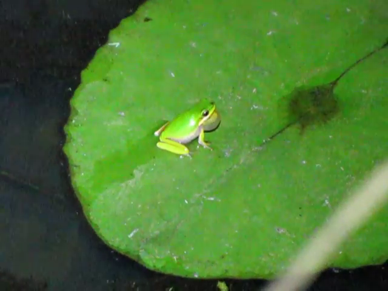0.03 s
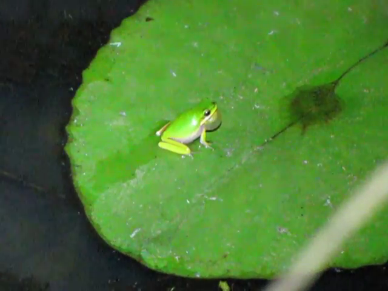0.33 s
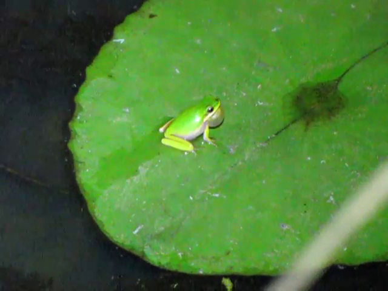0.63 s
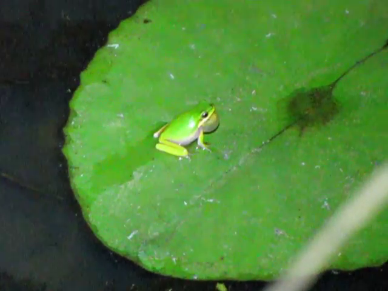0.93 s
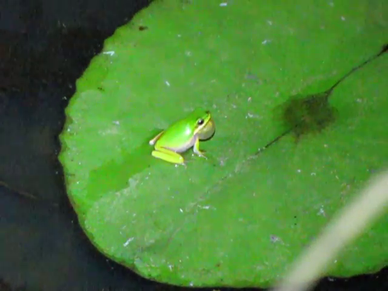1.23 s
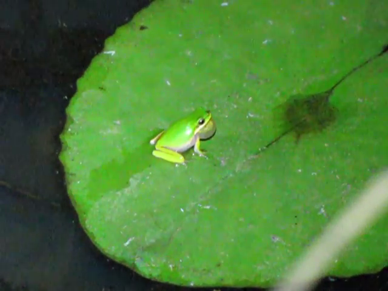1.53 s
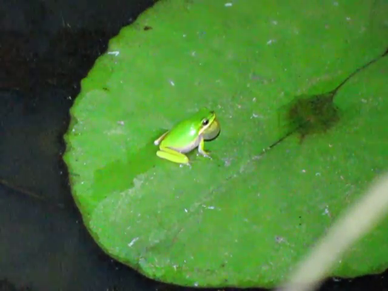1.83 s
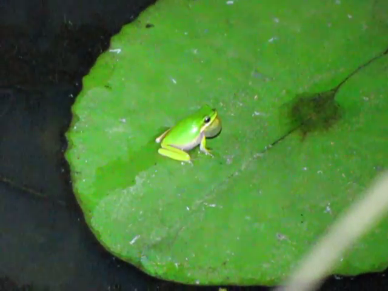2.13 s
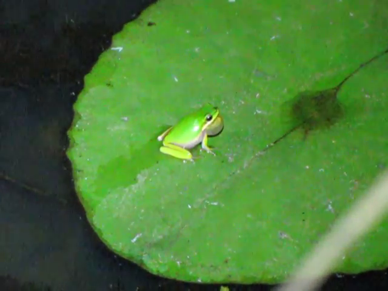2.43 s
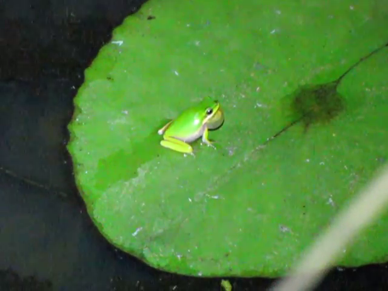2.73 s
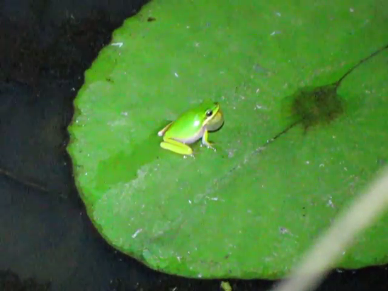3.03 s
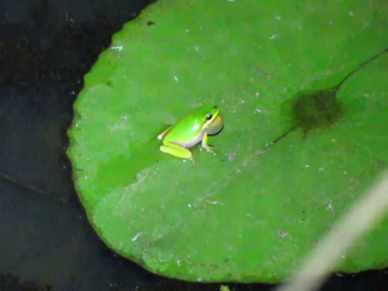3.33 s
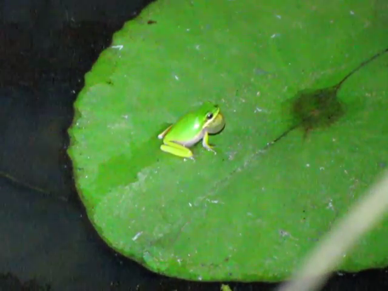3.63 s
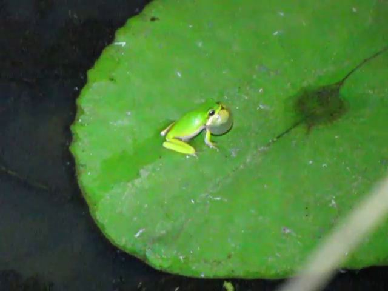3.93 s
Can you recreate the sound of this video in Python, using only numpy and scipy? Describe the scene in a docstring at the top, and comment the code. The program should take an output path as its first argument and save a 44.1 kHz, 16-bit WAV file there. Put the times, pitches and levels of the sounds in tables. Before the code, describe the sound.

Tree frogs call close to the microphone with high, rising creaks and sharp clicks. Behind them a night pond carries a continuous frog chorus, lower trills, a slowing run of rattling quacks and a faint insect buzz.

```python
"""Tree frogs creak and click close by at a night pond. Each call is a train of ringing pulses near
4.5 kHz: long trains rise as creaks, short ones snap as clicks. Behind them sit a chorus of the same
kind, lower trills and a slowing run of rattling quacks, all scattered by water and plants.
A thin insect buzz, a wash of far callers and night rumble, and a faint hum fill the background."""
import sys
import numpy as np
from scipy import signal
from scipy.io import wavfile
from scipy.ndimage import uniform_filter1d

SR = 44100
rng = np.random.default_rng(int(sys.argv[2]) if len(sys.argv) > 2 else 0)


def to_wav(s):
    """Save 16-bit WAV."""
    ch = np.atleast_2d(s).T  # columns
    pcm = np.round(np.clip(ch, -1, 1) * 32767)  # PCM
    wavfile.write(sys.argv[1], SR, pcm.astype(np.int16))


N = 176400
TIME = np.arange(N) / SR

# Near frog voices, by name: left over right/dB, left phase lead/rad, after-pulse gain, brightness/dB
FROG_VOICES = {"a": (-3, -1.57, .5, 0), "b": (-1, 4, 0.64, 5.5), "c": (-1.4, 1.91, 0.34, -0.23),
               "d": (2, 0.9, 0.22, 7), "e": (-6, -3, 1.1, 0.5), "f": (4, 0.94, 0.17, 0)}
# Their calls: frog, first pulse t/s, last pulse t/s, pulse count, first and last gap over middle gap,
# start f/Hz, end f/Hz, relative level/dB at start, middle and end
FROG_CALLS = [ ("d", .0111, .0234, 2, 1, 1, 4700, 4630, -9, -10, -11),
              ("a", .1577, .1733, 3, .97, 1.03, 4560, 4330, -6, -9, -11.5),
              ("d", .3083, .3322, 4, 1, 1.08, 4540, 4450, -7.5, -9, -15),
              ("b", .3386, .5309, 16, .97, 1.12, 4450, 4650, -17, -15, -13.5),
              ("b", .7721, .7939, 4, .97, .96, 4620, 4500, -11, -6, -12.5),
              ("a", 1.0289, 1.1401, 11, .87, 1.15, 4170, 4650, -9, -7, -11.5),
              ("b", 1.2715, 1.3559, 8, 1.02, 2, 4280, 4580, -23, -10.5, -9.5),
              ("c", 1.466, 1.553, 8, 1, 1, 3400, 3650, -22, -20, -24),
              ("a", 1.4927, 1.5084, 3, 1, 1, 4600, 4340, -6, -10, -14),
              ("f", 1.818, 1.926, 10, 1, 1, 4150, 4400, -20, -19, -21),
              ("c", 2.1775, 2.201, 3, .94, 1.06, 4350, 4300, -16, -13, -14),
              ("b", 2.17, 2.209, 5, 1, 1, 3400, 3550, -22, -16, -20),
              ("c", 2.292, 2.428, 11, 1, 1, 3700, 3820, -23, -21, -16),
              ("c", 2.441, 2.839, 33, 1.12, 1.085, 3900, 4560, -14, -7.5, -6),
              ("e", 2.9645, 3.203, 18, 1, 1.06, 4380, 4520, -17, -14, -11),
              ("c", 3.3375, 3.3566, 3, 1.04, .96, 4370, 4400, -4, -4, -7),
              ("e", 3.5118, 3.5329, 3, .88, 1.12, 4350, 4410, -12, -9, -8),
              ("f", 3.6845, 3.8015, 12, 1.04, .96, 4200, 4550, -18.5, -15, -14),
              ("f", 3.8115, 3.9508, 15, 1.01, .99, 4550, 5080, -14, -13, -12),
              ("d", 3.961, 3.9805, 3, 1.07, .93, 4950, 4890, -6.5, -7, -8.5),
              ("f", 3.9977, 4.007, 2, 1, 1, 4350, 4350, -7, -8, -9)]
# Fader ride of the chorus: t/s, relative level/dB
CHORUS_RIDE = [(0, 4), (.22, -3), (.6, 1), (.85, -2), (1, 1), (1.25, -1), (1.65, -3), (1.98, -1.5),
               (2.15, 1.5), (2.6, 3.5), (2.9, -1), (3.4, -1.5), (3.75, 4.5), (4, 4)]
# Lower trills: start t/s, length/s, pulse rate/Hz, f/Hz, relative level/dB, low resonance against main/dB
TRILL_CALLS = [(-.03, .27, 68, 2580, -26, -4), (.2, .21, 55, 2620, -30, -14), (.53, .24, 72, 2600, -25, -4),
               (.82, .18, 70, 2550, -32, -5), (1.36, .22, 60, 2600, -31, -12),
               (1.54, .23, 80, 2620, -26, -5), (1.95, .3, 66, 2500, -34, -6),
               (2.3, .25, 62, 2850, -27, -16), (2.38, .24, 70, 2560, -27, -4),
               (2.62, .2, 62, 2580, -31, -8), (2.82, .27, 60, 2610, -27, -16),
               (3.43, .29, 72, 2600, -25, -5), (3.72, .33, 70, 2550, -31, -4)]
# Fader ride of the quacks: t/s, relative level/dB
QUACK_RIDE = [(.7, -13), (1.05, -7.5), (1.7, -4.5), (2.2, -0.5), (2.6, 2), (2.9, -1), (3.2, 1), (3.6, -1),
              (3.9, -2)]
# Throat resonances of a quack: f/Hz, ring time/s, level/dB before the ride, swell delay/s
QUACK_RESONANCES = [(1095, 0.0013, -45, -0.00037), (1410, 0.00092, -43, 0.0019),
                    (1724, 0.00072, -37, -0.01), (1950, 0.0013, -35.5, -0.0055), (2280, 0.0004, -36, -0.02)]
# Insect buzzes: start t/s, length/s, level/dB
INSECT_BUZZES = [(0.066, .53, -48.5), (3.036, 0.56, -48.5)]
# Tone curve of the far wash: f/Hz, relative level/dB
WASH_SPECTRUM = [(25, -5), (60, 2), (150, -0.5), (300, -5.5), (700, -11.5), (1100, -3.5), (1500, 0.5),
                 (2000, 12), (2600, 15.5), (3200, 10), (3600, 17), (4000, 26.5), (4500, 25), (5000, 13),
                 (5500, 2), (6500, 1.5), (7700, -10), (9200, -4), (10300, -28.5), (11500, -16.5),
                 (13200, -27), (15500, -50)]
# Stereo image of the wash: f/Hz, left-right correlation
WASH_CORRELATION = [(50, 0.81), (300, 0.88), (1000, 0.84), (2200, 0.38), (3500, 0.19), (4500, -.1),
                    (8000, -0.46), (14000, -0.42)]
# Fader ride of the hum: t/s, level/dB
HUM_RIDE = [(0, -64.5), (2, -65), (2.3, -70.5), (4, -77)]

NEAR_DB, NEAR_WET_DB, PITCH_EASE, UNEVEN_DB = 1, -14.5, 1.75, 1.03
RISE_S, RING_S, RING_SHAPE, AFTER_S = .001, .0014, 1.5, .0019
CHIRP, CHIRP_S, SAG, THIRD_SAG = .12, .00084, .026, .051  # a pulse starts sharp and sags flat
SECOND_DB, THIRD_DB, SNAP_DB, SNAP_S = -34, -35.5, -19, .0019
CHORUS_DB, CHORUS_HZ, CHORUS_SPREAD, CHORUS_GAP_S, CHORUS_WET_DB = -30.5, 4340, .059, .012, -2
TRILL_DB, TRILL_RING_S, TRILL_LOW_HZ, TRILL_LOW_RING_S, TRILL_WET_DB = -3, .0013, 2080, .0008, -8
QUACK_START_S, QUACK_GAP_S, QUACK_SLOWING_S = .707, .0796, .0262
QUACK_LENGTH_S, QUACK_PULSE_HZ, QUACK_WET_DB = .07, 149.9, -3
BUZZ_HZ, WING_HZ, HUM_HZ = 6900, 54, 101.4
WASH_DB, PATCH_DB, WASH_SWELL = -31, 2.94, .44
TAIL_T60_S, SPLASH_S, SPLASH_GAIN = .48, .0089, 2.3
TREBLE_HZ, BAND_LIMIT_HZ = 14200, 15800


def near_frogs():
    """Foreground creaks and clicks: pulse trains whose pitch glides and levels off."""
    out = np.zeros((2, N))
    for frog, first, last, count, gap_in, gap_out, hz_in, hz_out, *levels in FROG_CALLS:
        pan_db, lead, after, bright_db = FROG_VOICES[frog]
        ears = unit(amp([[pan_db / 2], [-pan_db / 2]])) * np.exp([[.5j * lead], [-.5j * lead]])
        gaps = arc(gap_in, 1, gap_out, np.linspace(0, 1, count - 1))
        steps = np.append(0, np.cumsum(gaps))
        onsets = first + (last - first) * steps / steps[-1]
        for onset, progress in zip(onsets, np.linspace(0, 1, count)):
            hz = hz_out + (hz_in - hz_out) * (1 - progress) ** PITCH_EASE
            gain = amp(NEAR_DB + arc(*levels, progress) + UNEVEN_DB * rng.standard_normal())
            at = onset - RISE_S + rng.normal(0, .00008)
            add(out, at, gain * frog_pulse(hz, after, ears, bright_db))
    return out + amp(NEAR_WET_DB) * pond_scatter(out)


def frog_pulse(hz, after, ears, bright_db, size=400):
    """One tree frog pulse in stereo: fast attack, sagging ring, after-pulse, overtones and a soft snap."""
    t = np.arange(size) / SR
    attack = np.sin(np.pi / 2 * np.minimum(t / RISE_S, 1)) ** 2
    env = attack * np.exp(-(np.maximum(t - RISE_S, 0) / RING_S) ** RING_SHAPE)
    tone = np.exp(2j * np.pi * hz * (t - CHIRP * CHIRP_S * np.exp(-t / CHIRP_S) - SAG * t))
    after_env = np.interp(t - AFTER_S * rng.uniform(.64, 1.44), t, env, left=0)
    after_phase = np.exp(1j * rng.normal(np.pi, 1))
    body = (env + after * after_env * after_phase) * tone
    burst = rng.standard_normal(size) * env * np.exp(-t / SNAP_S)
    snap = signal.lfilter(*signal.butter(4, [3200, 9000], "band", fs=SR), burst)
    second = amp(SECOND_DB) * env ** 1.1 * tone ** 2
    third = amp(THIRD_DB) * env ** 1.5 * tone ** 3 * np.exp(-2j * np.pi * hz * THIRD_SAG * t)
    sparkle = amp(bright_db) * (second + third + amp(SNAP_DB) * snap)
    sparkle_ears = abs(ears) * np.exp([[.7j], [-.7j]])  # same pan as the body, its own phase spread
    return (ears * body + sparkle_ears * sparkle).real


def chorus(count=52):
    """Distant tree frogs all around the pond, their rising creaks overlapping into a bed."""
    out = np.zeros((2, N))
    for start in (np.arange(count) + rng.random(count)) / count * (N / SR + .3) - .3:
        hz = CHORUS_HZ * (1 + CHORUS_SPREAD * rng.standard_normal())
        gap = CHORUS_GAP_S * rng.uniform(.8, 1.2)
        ears = np.exp([[0], [2j * np.pi * rng.random()]])  # placed by phase alone
        onsets = np.arange(0, rng.uniform(.12, .36), gap)
        for onset, progress in zip(onsets, onsets / onsets[-1]):
            gain = amp(arc(-10, 0, -2.7, progress) + 2 * rng.standard_normal())
            glide = 1 + .085 * (progress - .5)
            at = start + onset + rng.normal(0, .0002)
            add(out, at, gain * frog_pulse(hz * glide, after=.25, ears=ears, bright_db=-4))
    bed = unit(out + amp(CHORUS_WET_DB) * pond_scatter(out))
    return bed * amp(CHORUS_DB + curve(CHORUS_RIDE, TIME))


def trills():
    """Lower-voiced frogs: pulse trains that swell and fade, ringing two resonances."""
    out = np.zeros(N)
    for start, length, rate, hz, db, low_db in TRILL_CALLS:
        for onset in np.arange(0, length, 1 / rate):
            main = throat_ping(hz * rng.normal(1, .015), TRILL_RING_S)
            low = amp(low_db) * throat_ping(TRILL_LOW_HZ * rng.normal(1, .063), TRILL_LOW_RING_S)
            add(out, start + onset, amp(db + arc(-7.5, 0, -11, onset / length)) * (main + low))
    return amp(TRILL_DB) * (out + amp(TRILL_WET_DB) * pond_scatter(out))


def quacks(count=37):
    """A slowing run of about eleven quacks a second, each a rattle of throat pings that darkens."""
    out, centre = np.zeros(N), QUACK_START_S
    for n in range(count):
        gap = 1 / (QUACK_PULSE_HZ * rng.normal(1, .05))
        for offset in np.arange(-QUACK_LENGTH_S, QUACK_LENGTH_S, gap):
            at = centre + offset + rng.normal(0, .0004)
            droop = 1 - 1.2 * offset
            for hz, ring_s, db, delay in QUACK_RESONANCES:
                swell = np.cos(np.pi * np.clip((offset - delay) / QUACK_LENGTH_S, -.5, .5))
                ping = throat_ping(hz * droop * rng.normal(1, .012), ring_s)
                add(out, at, swell * amp(db + curve(QUACK_RIDE, centre)) * ping)
        centre += QUACK_GAP_S + QUACK_SLOWING_S * ((n + 1) / count) ** 2
    return out + amp(QUACK_WET_DB) * pond_scatter(out)


def throat_ping(hz, ring_s, size=700):
    """One throat resonance rings with a soft attack, peaking at ring_s."""
    t = np.arange(size) / SR
    return t / ring_s * np.exp(1 - t / ring_s) * np.sin(2 * np.pi * (hz * t + rng.random()))


def insect():
    """A thin, high tone chopped by wing strokes."""
    out = np.zeros(N)
    for start, length, db in INSECT_BUZZES:
        t = np.arange(0, length, 1 / SR)
        strokes = abs(np.sin(np.pi * WING_HZ * t)) ** 3
        jittery_hz = BUZZ_HZ * (1 + .056 * rng.standard_normal(len(t)))
        tone = np.sin(2 * np.pi * np.cumsum(jittery_hz) / SR)
        add(out, start, amp(db + arc(-3, 0, 0, t / length)) * strokes * tone)
    return out


def far_wash():
    """The farthest callers and low night rumble, blurred into noise that swells with the chorus."""
    hz = np.fft.rfftfreq(1024, 1 / SR)
    left_re, left_im, other_re, other_im, patches = rng.standard_normal((5, len(hz), N // 256 + 5))
    patches = uniform_filter1d(patches, size=10, axis=0, mode="wrap")  # shimmer about 430 Hz wide
    patches = unit(uniform_filter1d(patches, size=12, axis=1, mode="wrap"))  # and 70 ms long
    correlation = np.clip(by_hz(WASH_CORRELATION, hz), -1, 1)[:, None]
    left = left_re + 1j * left_im
    right = correlation * left + np.sqrt(1 - correlation ** 2) * (other_re + 1j * other_im)
    colour = amp(by_hz(WASH_SPECTRUM, hz)[:, None] + PATCH_DB * patches)
    blur = signal.istft(np.array([left, right]) * colour, nperseg=1024, noverlap=768)[1][:, :N]
    return amp(WASH_DB + WASH_SWELL * curve(CHORUS_RIDE, TIME)) * unit(blur)


def hum():
    """A faint low sine that fades from halfway on."""
    return amp(curve(HUM_RIDE, TIME)) * np.sin(2 * np.pi * HUM_HZ * TIME)


def pond_scatter(x):
    """Reverb off water and plants: a quick splash and a thin tail, different at each ear."""
    t = np.arange(SR // 2) / SR
    decay = amp(-60 * t / TAIL_T60_S) + SPLASH_GAIN * np.exp(-t / SPLASH_S)
    taps = rng.standard_normal((2, len(t))) * (t > .003) * decay  # 3 ms pre-delay
    return signal.fftconvolve(np.atleast_2d(x), taps / np.linalg.norm(taps[0]), axes=1)[:, :N]


def amp(db):
    """Decibels to gain."""
    return 10 ** (np.asarray(db) / 20)


def unit(x):
    """Scales to rms 1."""
    return x / np.sqrt(np.mean(x ** 2) + 1e-20)


def curve(points, at):
    """Straight lines through breakpoints."""
    return np.interp(at, *np.transpose(points))


def by_hz(points, hz):
    """Straight lines on a log-frequency axis."""
    f, value = np.transpose(points)
    return np.interp(np.log(hz + 1), np.log(f), value)


def arc(start, middle, end, u):
    """A parabola through three values as u goes from 0 to 1."""
    return start * (1 - u) * (1 - 2 * u) + middle * 4 * u * (1 - u) + end * u * (2 * u - 1)


def add(mix, start_s, sound):
    """Drops a sound into the mix if it starts within the scene."""
    i = round(start_s * SR)
    if 0 <= i < N:
        mix[..., i:i + sound.shape[-1]] += sound[..., :N - i]


def scene():
    """The pond mix, front to back."""
    return near_frogs() + chorus() + trills() + quacks() + insect() + far_wash() + hum()


def record(dry):
    """The microphone's treble roll-off and the recorder's band limit."""
    soft = signal.lfilter(*signal.butter(6, TREBLE_HZ, fs=SR), dry)
    band_limit = signal.firwin(255, BAND_LIMIT_HZ, window=("kaiser", 9), fs=SR)
    return signal.oaconvolve(soft, band_limit[None], "same")


dry = scene()
out = record(dry)
to_wav(out)
```